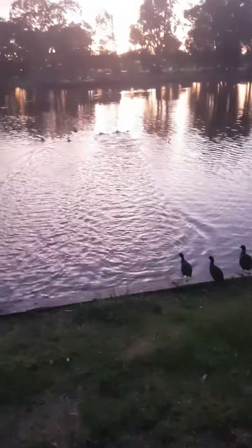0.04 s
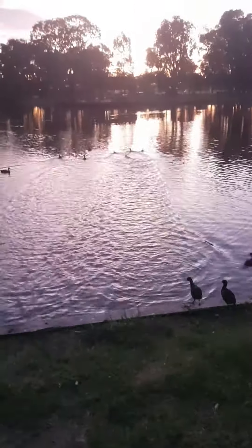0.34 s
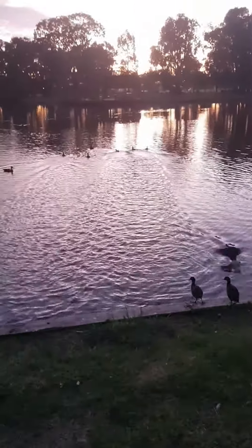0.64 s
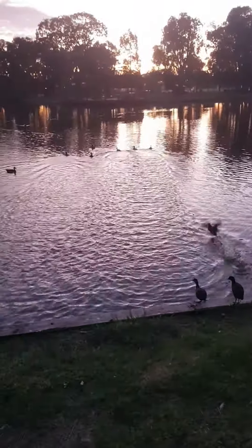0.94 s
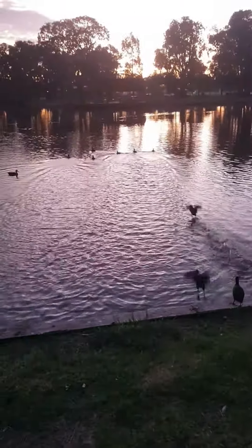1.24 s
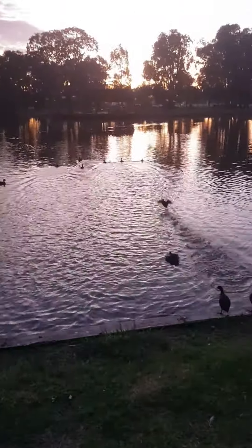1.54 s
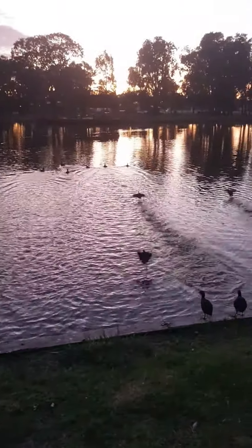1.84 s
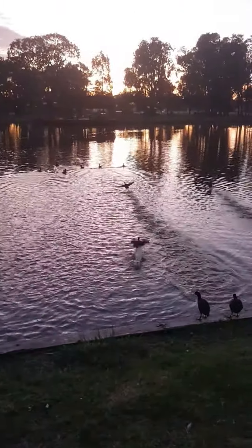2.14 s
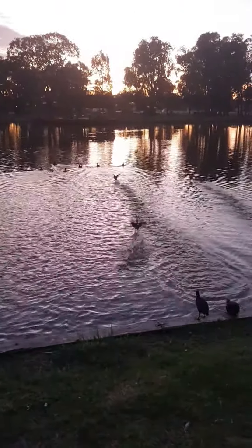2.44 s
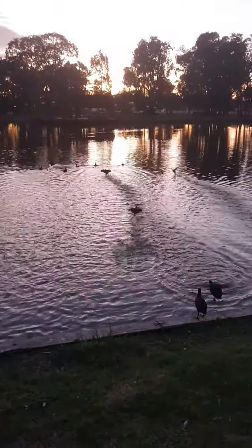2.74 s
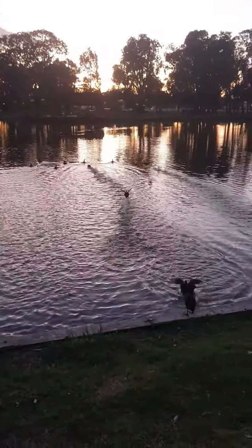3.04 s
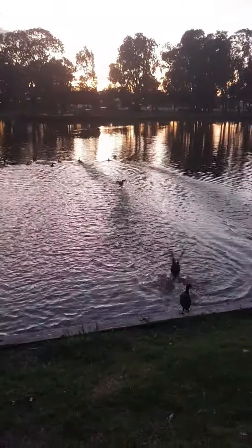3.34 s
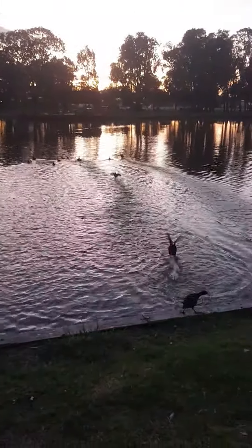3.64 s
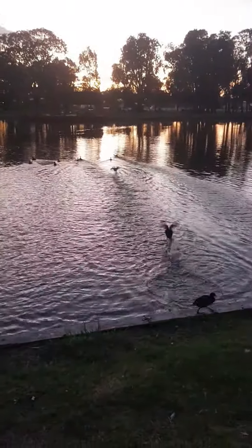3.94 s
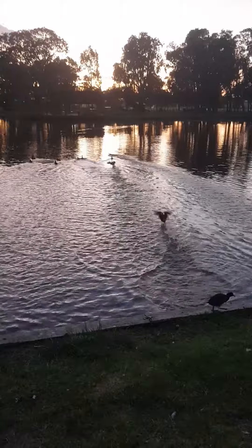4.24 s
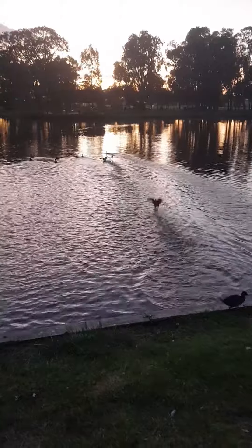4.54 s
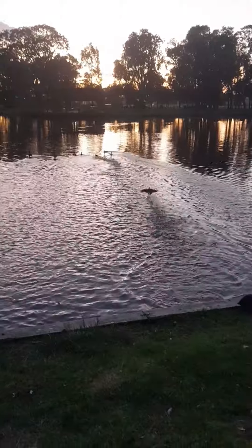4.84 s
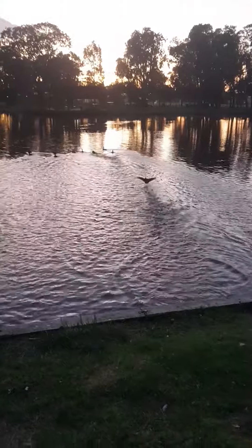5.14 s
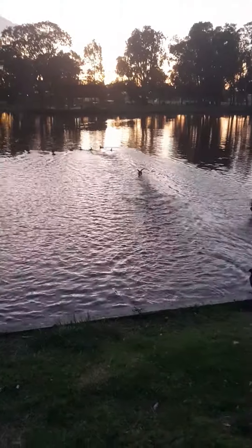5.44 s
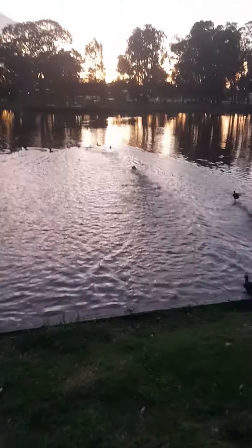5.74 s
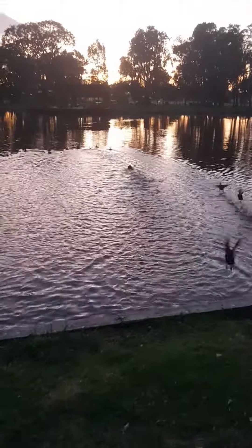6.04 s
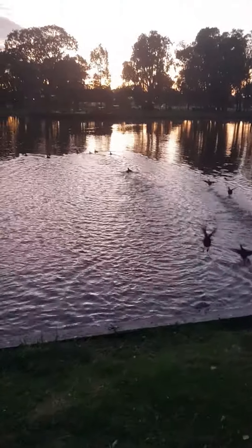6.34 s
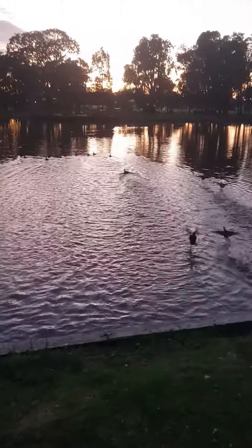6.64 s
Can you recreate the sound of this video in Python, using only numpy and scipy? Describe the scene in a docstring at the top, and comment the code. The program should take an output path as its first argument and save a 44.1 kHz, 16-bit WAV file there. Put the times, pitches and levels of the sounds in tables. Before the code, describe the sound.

Waterbirds run over calm lake water in quick slapping steps and spray, and one nearby bird gives a short, loud rattling call.

```python
"""A calm lake lies under a low distant rumble, and faint calls carry across it.
Within the first second small waterbirds begin to run over the water, one after another, to take off.
Their feet slap air pockets into the surface and throw up spray that patters back.
At 4.4 s a bird close by gives a loud rattling cry: forty pulses a second, each a dip in pitch
as its syrinx presses shut. Softer runs follow to the end."""
import sys
import numpy as np
from scipy import signal
from scipy.fft import rfft, irfft, next_fast_len
from scipy.io import wavfile
from scipy.ndimage import uniform_filter1d

SR = 44100
rng = np.random.default_rng(int(sys.argv[2]) if len(sys.argv) > 2 else 0)


def materialize(psi):
    """Save the field psi as 16-bit PCM at rate SR to the path in sys.argv[1].

    A 1-D psi becomes a single channel; in a 2-D psi each row is a channel.
    """
    bounded = np.clip(np.atleast_2d(psi).T, -1, 1)
    quanta = np.round(bounded * 32767).astype(np.int16)
    wavfile.write(sys.argv[1], SR, quanta)


N = 295470
T = np.arange(N) / SR

# Churned water. Each row: time in seconds, then relative levels in dB of bubbles, splash and fine spray.
CHURN = [(0, -62, -64, -63.5), (.55, -64, -68, -86), (0.7, -49.5, -53.5, -60), (0.85, -45.5, -47, -55.5),
         (1.21, -46.5, -45, -51.5), (1.79, -51, -50.5, -52.5), (2.09, -41, -47, -52),
         (2.69, -51, -49, -54.5), (3.07, -46.5, -50, -55.5), (3.45, -44.5, -47.5, -52.5),
         (4.09, -47, -50, -58), (4.35, -44, -50, -58.5), (4.85, -51, -54, -63), (5.312, -61, -56, -65.5),
         (5.792, -52, -55, -58.5), (5.982, -58, -57, -62), (6.7, -53.5, -53.5, -56.5)]


def from_db(db):
    """Amplitude grows tenfold with every 20 dB."""
    return 10 ** (np.asarray(db) / 20)


def rms_one(x):
    """Normalisation brings the mean power to 1."""
    return x / np.sqrt(np.mean(x ** 2) + 1e-20)


def in_time(rows):
    """Linear interpolation gives each column of a time curve at every sample."""
    times, *columns = np.transpose(rows)
    return [np.interp(T, times, column) for column in columns]


def at_hz(points, hz):
    """Interpolation reads a spectrum on a logarithmic frequency axis."""
    freqs, values = np.transpose(points)
    return np.interp(np.log(np.maximum(hz, 1)), np.log(freqs), values)


def shaped(x, gain):
    """Filtering multiplies the spectrum by a function of frequency."""
    size = next_fast_len(N + 8192)
    hz = np.arange(size // 2 + 1) * SR / size
    return irfft(rfft(x, size) * gain(hz), size)[..., :N]


def band(x, low_hz, high_hz, order=2):
    """A causal band-pass attenuates what lies outside its two edges."""
    sos = signal.butter(order, [low_hz, min(high_hz, .47 * SR)], "band", fs=SR, output="sos")
    return signal.sosfilt(sos, x + 1e-18)


def resonate(x, hz, width_hz):
    """A damped two-pole resonator has unit gain at its peak."""
    r = np.exp(-np.pi * width_hz / SR)
    feedback = [1, -2 * r * np.cos(2 * np.pi * hz / SR), r * r]
    return signal.lfilter(np.array([1, 0, -1]) * (1 - r * r) / 2, feedback, x + 1e-18)


def drift(rate):
    """A random fluctuation of rms 1 moves to a new value rate times a second."""
    knots = rng.standard_normal(N // 8)
    return rms_one(np.interp(T * rate, np.arange(len(knots)), knots))


def add(out, s, sound):
    """Superposition: a sound joins the mix from s seconds on."""
    i = max(int(round(s * SR)), 0)
    out[..., i:i + sound.shape[-1]] += sound[..., :max(N - i, 0)]


def diffuse(pair, spectrum):
    """A diffuse field is coherent in the bass: two noises become stereo of rms 1, coloured by (Hz, dB)."""
    # Each row: frequency in Hz, correlation of left and right.
    coherence = [(30, 0.99), (70, 0.96), (130, 1), (640, 0.82), (1400, 0.77), (3000, 0.32), (6000, 0.096),
                 (15000, 0.14)]
    alike = lambda hz: np.clip(at_hz(coherence, hz), -.99, .99)
    mid = shaped(pair[0], lambda hz: from_db(at_hz(spectrum, hz)) * np.sqrt(1 + alike(hz)))
    side = shaped(pair[1], lambda hz: from_db(at_hz(spectrum, hz)) * np.sqrt(1 - alike(hz)))
    return rms_one(np.array([mid + side, mid - side]))


def patter(per_s, size_db, clump_db):
    """Shot noise: two trains of uneven impacts share their random instants and swell in clumps."""
    born = rng.random(N) < per_s / SR
    sizes = from_db(size_db * np.minimum(rng.exponential(1, N), 5) + clump_db * drift(rate=160))
    return born * sizes * rng.standard_normal((2, N))


def background(air_db=-52):
    """Diffuse noise makes a low distant rumble and the faint hiss of open air."""
    # Each row: frequency in Hz, relative spectral density in dB.
    rumble_spectrum = [(13, -41), (22, -64), (44, 0.5), (65, 6), (105, 1.5), (205, -12), (400, -17.5),
                       (520, -39), (880, -120)]
    air_spectrum = [(120, 4.5), (200, -1.5), (400, -14.5), (850, -3), (1030, -6), (1250, -2.5),
                    (1900, -15.5), (2250, -18), (2500, -9.5), (4000, -11), (4400, -38), (8000, -30),
                    (12000, -20.5), (16000, -22)]
    # Each row: time in seconds, level in dB.
    rumble_levels = [(0, -46.5), (1.25, -45), (3, -46), (4.45, -45), (4.65, -53), (5.8, -54), (6.7, -51)]
    rumble = from_db(in_time(rumble_levels)[0]) * diffuse(rng.standard_normal((2, N)), rumble_spectrum)
    return rumble + from_db(air_db) * diffuse(rng.standard_normal((2, N)), air_spectrum)


def shore(x, near_s=.008, near_db=-19, tail_db=-33, t60_s=.48):
    """Reflection returns one quick dull echo, then faint scatter from the bank and the trees."""
    t = np.arange(SR) / SR
    scatter = rng.standard_normal((2, SR)) * from_db(-60 * t / t60_s)
    tail = signal.fftconvolve(x, scatter / np.linalg.norm(scatter[0]), axes=1)[:, :N]
    near = np.array([np.interp(T - near_s, T, side) for side in x])
    return band(from_db(near_db) * near + from_db(tail_db) * tail, 400, 7500, order=1)


def far_calls(waver=.013):
    """Birds across the lake give short pure tones, frequency-modulated by a glide and a waver."""
    # Each row: centre time and length in seconds, first and last pitch in Hz, level in dB.
    notes = [(0.095, 0.122, 1237, 1355, -53), (0.497, 0.063, 1220, 1030, -49),
             (5.062, 0.022, 1195, 1387, -37.5)]
    out, wobble = np.zeros(N), 1 + waver * drift(rate=140)
    for s, length, start_hz, end_hz, db in notes:
        pitch = np.interp(T, [s - length / 2, s + length / 2], [start_hz, end_hz]) * wobble
        swell = from_db(db) * np.exp(-(2 * (T - s) / length) ** 2)
        out += swell * np.sin(2 * np.pi * np.cumsum(pitch) / SR)
    return out


def wake(cycles=6, bubble_db=1.5, splash_db=2, spray_db=5.5):
    """In churned water small bubbles resonate, while falling drops and fine spray make impact noise."""
    # Each row: frequency in Hz, relative spectral density in dB.
    splash_spectrum = [(650, -28), (1300, -5.5), (1700, -4.5), (3700, -6), (7000, -15), (10000, -28),
                       (16000, -50)]
    spray_spectrum = [(3500, -20), (6000, -5), (7000, -4), (7900, -.5), (9800, -2.5), (12200, 1.5),
                      (15000, -2.5), (16000, -6)]
    bubble_colour = [(250, -4), (420, -.5), (650, 10), (1000, 1), (1300, 2.5), (1800, -10.5)]
    bubbles, splash, spray = from_db(in_time(CHURN))
    births, size_class = patter(per_s=1100, size_db=4, clump_db=1), rng.integers(0, 18, N)
    pitches = np.geomspace(300, 1600, 18)
    rings = sum(resonate(births * (size_class == k), hz, hz / cycles) for k, hz in enumerate(pitches))
    rings = from_db(bubble_db) * diffuse(rings, bubble_colour)
    heavy = from_db(splash_db) * diffuse(patter(per_s=7000, size_db=2, clump_db=2.5), splash_spectrum)
    fine = from_db(spray_db) * diffuse(patter(per_s=7000, size_db=3, clump_db=3.5), spray_spectrum)
    return bubbles * rings + splash * heavy + spray * fine


def droplets(per_s=70, size_db=7, cycles=3, level_db=-9):
    """Lone droplets fall out of the spray, each exciting a brief damped resonance."""
    falls, size_class = patter(per_s, size_db, clump_db=-1.5), rng.integers(0, 10, N)
    pitches = np.geomspace(3500, 14500, 10)
    pings = sum(resonate(falls * (size_class == k), hz, hz / cycles) for k, hz in enumerate(pitches))
    return from_db(in_time(CHURN)[2] + level_db) * rms_one(pings)


def plunges(length_s=.0054, gap_s=.035, pitch_spread=.217, flutter=.25, gurgle_db=-3, gurgle_s=.01):
    """A bird sinks in and opens large cavities that resonate in low gulps as water gurgles in."""
    # Each row: start and length in seconds, level in dB, cavity pitch in Hz.
    strokes = [(0.881, .02, -41, 324), (2.087, .02, -44.5, 375), (2.242, .05, -37.5, 279),
               (3.044, .05, -40.5, 298.6), (3.153, .09, -42, 209), (3.699, .02, -43.5, 359),
               (4.937, .05, -47, 252)]
    gulps, rush, t = np.zeros(N), np.zeros(N), np.arange(-SR // 20, SR // 20) / SR
    wobble = 1 + flutter * drift(rate=220)
    for (start, length, db, hz), detunes in zip(strokes, rng.uniform(-.92, 1, (len(strokes), 20))):
        for s, detune in zip(np.arange(start, start + length, gap_s), detunes):
            pitch = hz * np.exp(pitch_spread * detune) * np.interp(s + t, T, wobble)
            swell = from_db(db) * np.exp(-.5 * (t / length_s) ** 2)
            add(gulps, s + t[0], swell * np.sin(2 * np.pi * np.cumsum(pitch) / SR))
            add(rush, s + t[0], from_db(db + gurgle_db) * np.exp(-.5 * (t / gurgle_s) ** 2))
    return gulps + rush * rms_one(band(rng.standard_normal(N), 134, 357))


def falling_drops(per_s=9, over_spray_db=20.5, body_db=-4, spread_db=.5):
    """Among the sharpest impacts, lesser ones fall at random with a strength that follows the spray."""
    # Each row: time in seconds, relative level in dB, level of the body against the tick in dB.
    sharpest = [(0.5974, -28, -23), (.617, -25.5, -17), (0.6705, -17, -5), (0.7501, -37, 8.5),
                (0.8658, -26, -8), (.9178, -26.5, -9), (1.0815, -31.5, 2), (1.163, -23.5, -8.5),
                (1.343, -18.5, -3), (1.4273, -17, -10), (1.506, -19.5, -7.5), (1.5833, -17, -23),
                (1.6641, -19, -5.5), (1.7439, -23.5, -7), (1.8294, -22.5, -5), (2.3925, -22, -10),
                (2.5723, -21, -16), (2.9938, -23, -18), (4.8255, -33, -6), (5.4796, -27, -5.5),
                (5.6099, -30, 0), (5.7752, -29, -8), (6.557, -32, -11)]
    chance = rng.random((int(per_s * N / SR), 3))
    times = chance[:, 0] * N / SR
    loud, full = (2 * chance[:, 1:].T - 1) * spread_db
    spray_db = np.interp(times, T, in_time(CHURN)[2])
    return list(sharpest) + list(zip(times, spray_db + over_spray_db + loud, body_db + full))


def near_drops(decay_s=.00064, scatter_s=.0019, scatter_db=-17, level_db=-6, left_minus_right_db=-2.5):
    """The impact of a near drop radiates a tick over a lower body, then it scatters into finer drops."""
    tick, body, t = np.zeros((2, N)), np.zeros((2, N)), np.arange(SR // 30) / SR
    attack = (1 - np.exp(-t / .0012)) ** 2
    envelope = attack * (np.exp(-t / decay_s) + from_db(scatter_db) * np.exp(-t / scatter_s))
    pan_db = left_minus_right_db * np.array([[.5], [-.5]])
    for s, db, body_db in falling_drops():
        hit = from_db(db + level_db + pan_db) * envelope / envelope.max()
        add(tick, s, hit)
        add(body, s, from_db(body_db) * hit)
    tick *= rms_one(band(rng.standard_normal((2, N)), 8500, 20700))
    body *= rms_one(band(rng.standard_normal(N), 1250, 5600))
    return tick + body


def footsteps(spread_db=1, pitch_spread=.0502, length_spread=.41, lift_s=.021, lift_db=-8.5, lift_share=.55):
    """A run is a periodic train of unequal slaps; many plop again as the foot pulls out."""
    # Each row: first and last step in seconds, number of steps, first and last relative level in dB,
    # pitch of the air pocket in Hz, slap length in seconds.
    runs = [(.66, 0.818, 2, -29, -30.5, 649.5, 0.0036), (1.043, 1.112, 2, -21, -22, 711, 0.005),
            (1.181, 1.392, 5, -34.5, -29, 793, .005), (1.436, 2.103, 7, -34, -26, 739, 0.0068),
            (2.136, 2.278, 3, -30, -30, 707, 0.0077), (2.43, 2.888, 6, -28, -29, 688, 0.0092),
            (2.977, 3.529, 7, -23.5, -32, 741.3, 0.0084), (3.693, 3.922, 4, -26, -26, 738, 0.0059),
            (4.018, 4.322, 4, -25.5, -34.5, 772, .005), (4.93, 5.221, 4, -42, -37.5, 761, 0.0054),
            (5.601, 5.841, 4, -33.5, -35.5, 762, 0.0041), (5.982, 6.394, 5, -39, -43, 811, .004),
            (6.435, 6.554, 3, -31.5, -35, 730, 0.0063)]
    steps = []
    for first, last, count, first_db, last_db, hz, length in runs:
        for along in np.linspace(0, 1, int(round(count))):
            loud, high, long = rng.standard_normal(3)
            lifts, late = rng.random(2)
            s = first + along * (last - first)
            db = first_db + along * (last_db - first_db) + spread_db * loud
            detune = np.exp(pitch_spread * high)
            steps.append((s, db, hz * detune, length * np.exp(length_spread * long)))
            if lifts < lift_share:
                steps.append((s + lift_s * (1 + (late - .5) / 2), db + lift_db, hz / detune, length))
    return steps


def thrown_water(steps, lead_s=.021, fall_s=.015, level_db=-17.5):
    """Each foot flings up a sheet of water that tears into coarse drops, a burst of shot noise."""
    colour = [(400, -20), (900, 8), (1400, 3), (2500, 1), (4500, -19), (9000, -32)]
    throw, t = np.zeros(N), np.arange(-SR // 25, SR // 10) / SR
    envelope = np.exp(-np.abs(t) / np.where(t < 0, lead_s, fall_s))
    for s, db, _, _ in steps:
        add(throw, s + t[0], from_db(db + level_db) * envelope)
    return throw * diffuse(patter(per_s=2500, size_db=0, clump_db=3.5), colour)


def slaps(steps, glide=.1338, flutter=.11, soft_s=.0079, froth_rise=.63, froth_s=.013, froth_db=-11):
    """A foot punches an air pocket that resonates a few unsteady cycles, sinks in pitch and froths shut."""
    froth_colour = [(200, -17), (450, -2), (750, 7), (1400, -18), (2500, -32), (8000, -30)]
    tone, wash, t = np.zeros(N), np.zeros(N), np.arange(-SR // 50, SR // 12) / SR
    wobble = drift(rate=500)
    for (s, db, hz, length), turn in zip(steps, rng.random(len(steps))):
        rise = .8 * length / soft_s   # short slaps land flat and start abruptly
        swell = np.exp(-(np.abs(t) / (length * np.where(t < 0, rise, 1))) ** 1.85)
        pitch = hz * (1 - glide * np.tanh(t / .0041) + flutter * np.interp(s + t, T, wobble))
        add(tone, s + t[0], from_db(db) * swell * np.sin(2 * np.pi * (np.cumsum(pitch) / SR + turn)))
        froth = np.exp(-np.abs(t) / (froth_s * np.where(t < 0, froth_rise * rise, 1)))
        add(wash, s + t[0], from_db(db + froth_db) * froth)
    pockets = band(tone, 290, 3000, order=1) * from_db([[-.6], [-1.4]])   # slightly to the left
    return pockets + wash * diffuse(rng.standard_normal((2, N)), froth_colour)


def cry_pulses(start_s=4.397, count=17, gap_s=.02306, gap_growth_s=.000226):
    """The pulse period lengthens evenly; the cry grows louder, harsher and fuller as the bird pushes."""
    # Each row: time in seconds, relative level in dB, overtone tilt in dB per octave,
    # seconds for which a pulse sounds before its lowest pitch.
    effort = [(4.397, -32, -2.2, .002), (4.42, -19.5, -2.5, .006), (4.49, -14.5, -1, .0044),
              (4.52, -15.5, .5, .0078), (4.63, -14.2, 1.7, .0087), (4.7, -14, 4, .015),
              (4.767, -15.3, 2.4, .015), (4.793, -21, 1.7, .0145)]
    k = np.arange(count)
    pulse_times = start_s + k * gap_s + gap_growth_s * k * (k - 1) / 2
    times, *columns = np.transpose(effort)
    return list(zip(pulse_times, *(np.interp(pulse_times, times, column) for column in columns)))


def syrinx(top_hz=2080, low_hz=540, dip_s=.0075, pitch_spread=.04, jitter=.024, rasp=.16, smear=.35,
           bite_db=4, edge_s=.0007, attack_s=.0047, onset_db=-6.5, release_s=.004):
    """A vibrating membrane presses shut in each pulse: the pitch dives and a whistle turns to a buzz."""
    # Each row: harmonic number, relative level in dB.
    pressed_spectrum = [(1, 4.5), (2, 4.5), (3, 2), (4, -9.5), (6, -8), (9, -16), (24, -34)]
    open_spectrum = [(1, 0), (2, -20), (3, -18), (6, -36), (24, -60)]
    source, swell, t = np.zeros(N), np.zeros(N), np.arange(-SR // 50, SR // 100) / SR
    k = np.arange(1, 25)[:, None]
    pressed, opened = from_db(at_hz(pressed_spectrum, k)), from_db(at_hz(open_spectrum, k))
    wobble, dip = drift(rate=900), np.exp(-np.abs(t / dip_s) ** 1.6)
    pulses = cry_pulses()
    for (s, db, tilt_db, lead_s), high in zip(pulses, rng.standard_normal(len(pulses))):
        age = t + lead_s
        detune = 1 + pitch_spread * high + jitter * np.interp(s + t, T, wobble)
        pitch = (top_hz + (low_hz - top_hz) * dip) * detune
        buzz = (1 - np.tanh((pitch - 1620) / 170)) / 2
        buzz *= (1 + np.tanh((age - .0008) / .0015)) / 2   # each pulse starts pure
        brightness = tilt_db + bite_db * dip * (1 - dip)   # greatest halfway down the dive
        overtones = ((1 - buzz) * opened + buzz * pressed) * from_db(brightness * np.log2(k))
        # the membrane closes gradually, so the overtones do not peak together
        phase = 2 * np.pi * k * np.cumsum(pitch) / SR - smear * k ** 2
        gate = (1 + np.tanh(age / (2 * edge_s))) * (1 + np.tanh((release_s - t) / (2 * edge_s))) / 4
        attack_db = onset_db * np.clip(1 - age / attack_s, 0, 1)
        add(source, s + t[0], gate * (overtones * (k * pitch < SR / 2) * np.cos(phase)).sum(axis=0))
        add(swell, s + t[0], gate * from_db(db + attack_db))
    return source * (1 + rasp * rng.standard_normal(N)), swell


def cry(level_db=1.5, shimmer_db=1.1, hiss_db=-29, lag_s=.00006):
    """Source and filter: the syrinx excites the resonances of the throat, and the open bill radiates."""
    # Throat and bill resonances. Each row: frequency in Hz, bandwidth in Hz, gain in dB.
    formants = [(695, 1600, -5.5), (1150, 140, 1.5), (1725, 223, 3), (3900, 370, 6.5), (4800, 1570, 0),
                (8400, 1900, -11), (11720, 1200, -6)]
    # Each row: frequency in Hz, gain of the open bill in dB.
    radiation = [(250, -18), (520, -1), (5400, 3.5), (6500, -6.5), (9000, 11.5), (12000, 2), (16000, -8)]
    # Each row: frequency in Hz, left minus right level in dB.
    balance = [(400, 0.5), (700, -4), (1300, -4.5), (2200, -6.5), (4200, 4.5), (8000, 5.5), (15000, -6)]
    source, swell = syrinx()
    voice = sum((-1) ** i * from_db(db) * resonate(source, hz, width)
                for i, (hz, width, db) in enumerate(formants))
    voice = shaped(voice, lambda hz: from_db(at_hz(radiation, hz)))
    # the effort, not the throat, sets the loudness
    voice /= np.sqrt(np.abs(uniform_filter1d(voice ** 2, size=160)) + 1e-4)
    voice *= swell * from_db(level_db + shimmer_db * drift(rate=1500))
    # air hisses through the bill, the more so the harder the pulse
    breath = rms_one(band(rng.standard_normal((2, N)), 10800, 13200))
    hiss = from_db(hiss_db) * swell * (swell / swell.max()) ** 2 * breath
    # the bird is to the right, so the left side hears it later
    left = shaped(voice, lambda hz: from_db(at_hz(balance, hz) / 2) * np.exp(-2j * np.pi * hz * lag_s))
    right = shaped(voice, lambda hz: from_db(-at_hz(balance, hz) / 2))
    return np.array([left, right]) + hiss


def scene():
    """The birds, their echoes, the water and the open air add by superposition."""
    steps = footsteps()
    birds = cry() + slaps(steps) + thrown_water(steps) + near_drops() + plunges() + far_calls()
    return birds + shore(birds) + wake() + droplets() + background()


def record(dry):
    """A steep low-pass filter removes the treble above 16 kHz."""
    return signal.sosfilt(signal.ellip(10, .2, 80, 16000, fs=SR, output="sos"), dry)


dry = scene()
out = record(dry)
materialize(out)
```